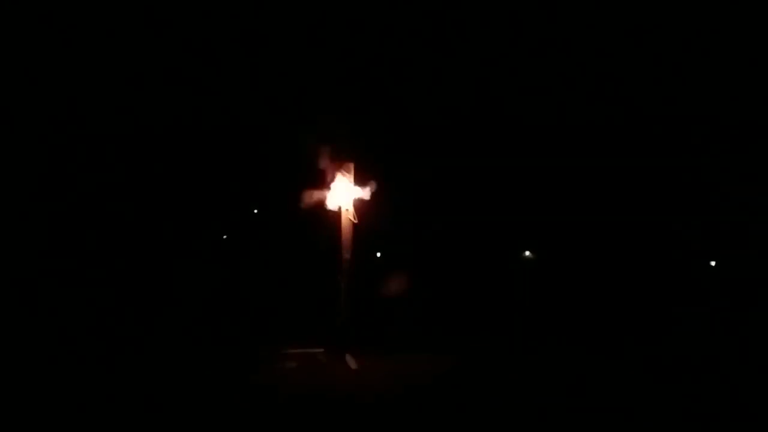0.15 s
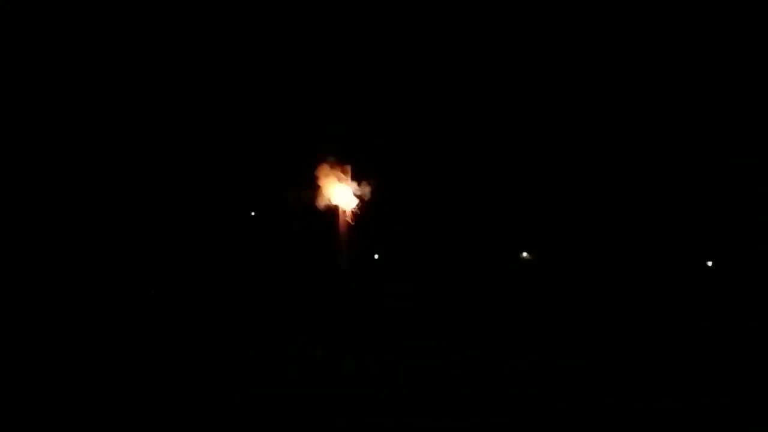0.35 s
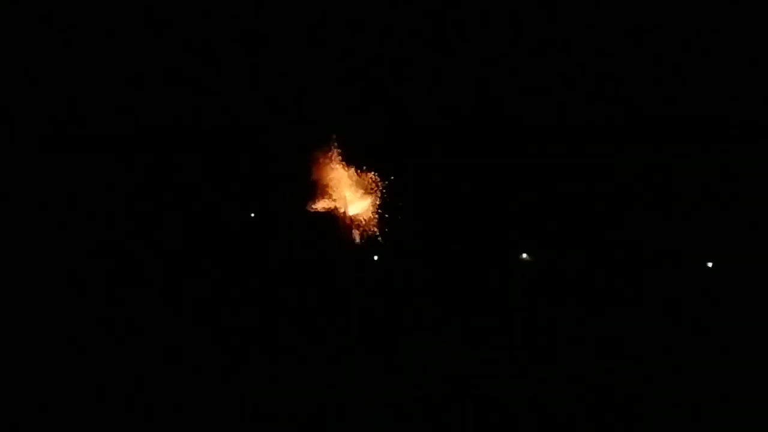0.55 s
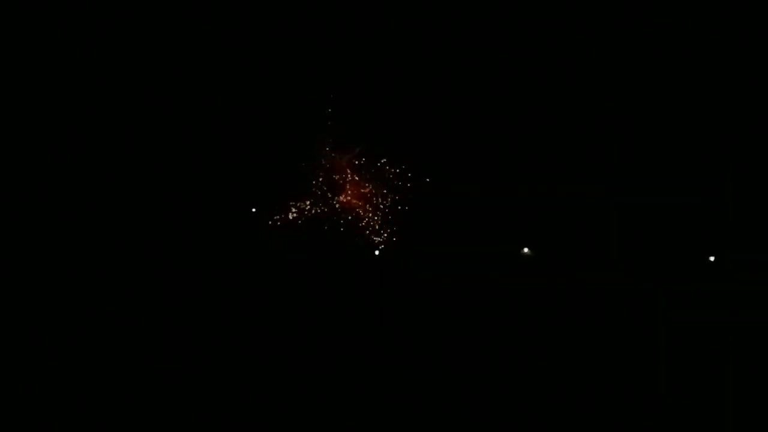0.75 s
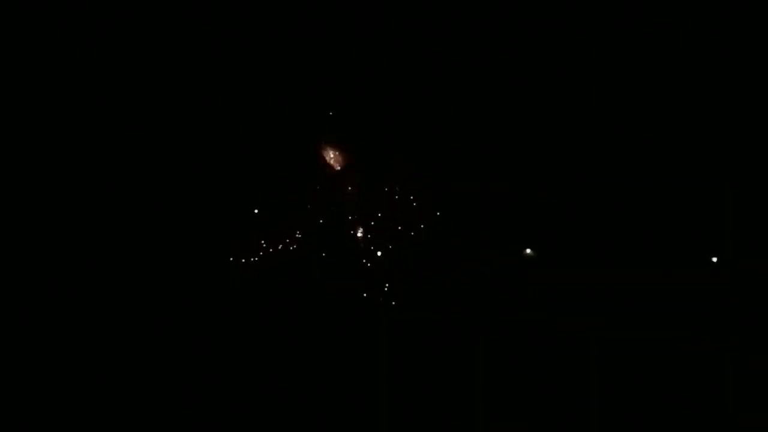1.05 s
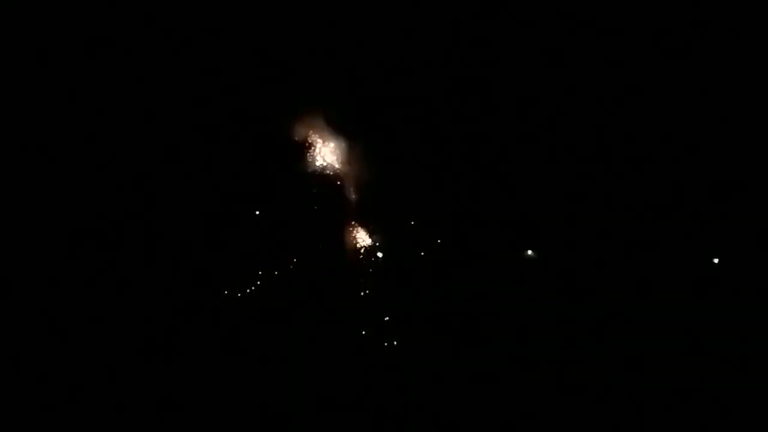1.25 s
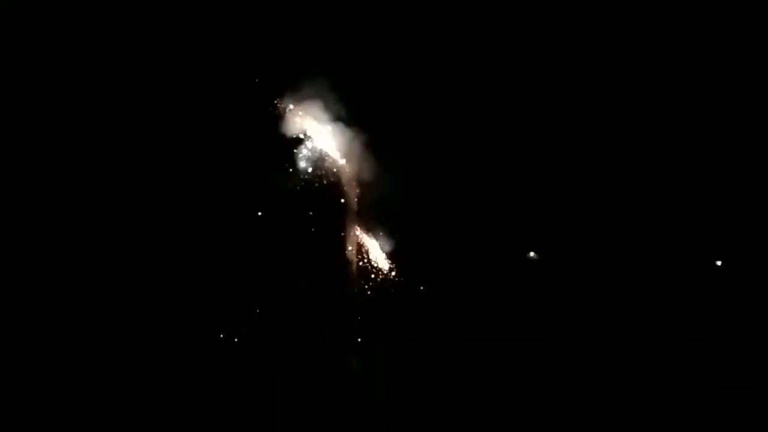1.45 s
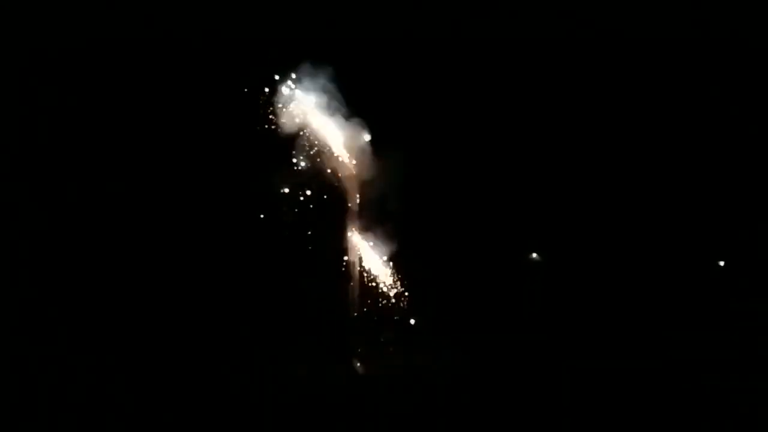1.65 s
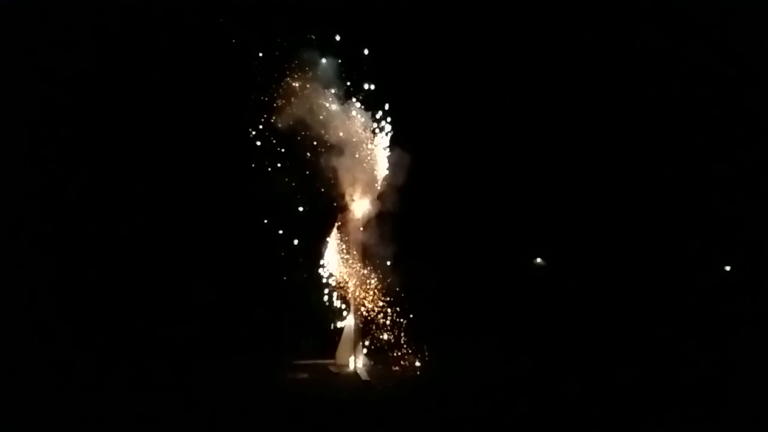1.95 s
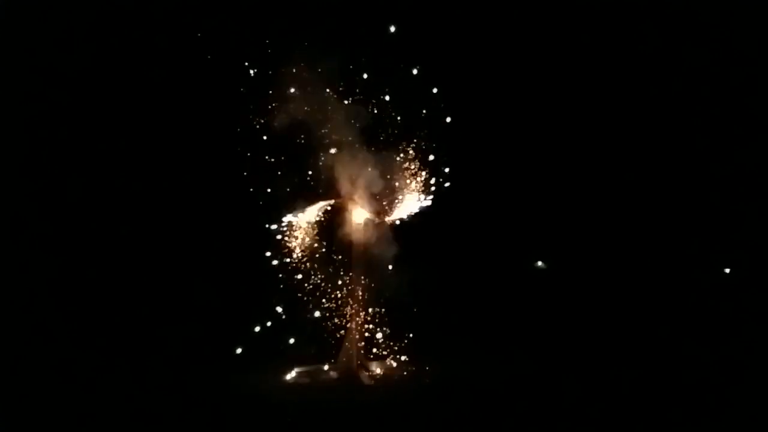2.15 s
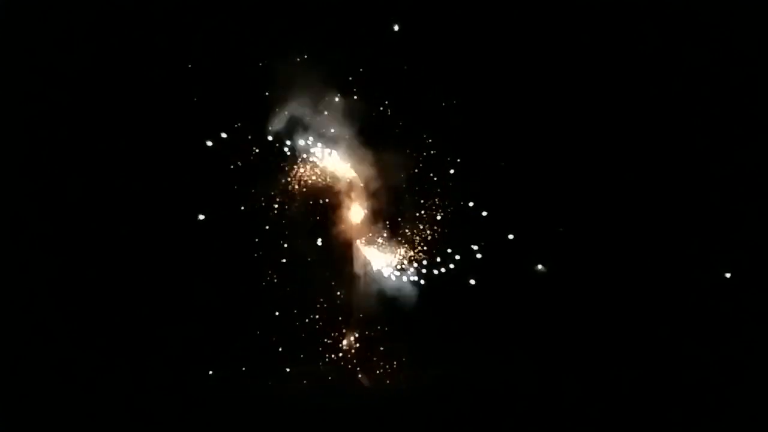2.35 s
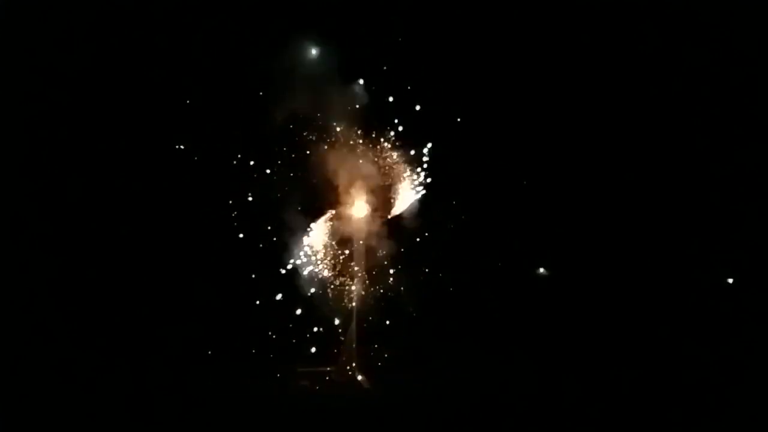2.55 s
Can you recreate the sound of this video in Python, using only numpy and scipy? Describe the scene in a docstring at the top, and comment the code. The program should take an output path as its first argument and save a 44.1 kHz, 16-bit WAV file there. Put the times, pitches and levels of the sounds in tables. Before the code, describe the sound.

A firework wheel sputters, cracks sharply, then hisses and builds to a roar.

```python
"""A firework wheel on a post, outdoors at night, close to a hand-held stereo microphone.
First the fuse sputters; at half a second the priming flares with one sharp crack and dies away.
Around one second, soft bumps reach the microphone over a low rumble, and two opposed rocket drivers
catch. They hiss, start to turn the wheel and build to a roar, their ground echoes sweeping as they
circle. Throughout, a faint tail comes back from farther off, over quiet night air."""
import sys
import numpy as np
from scipy import signal
from scipy.fft import rfft, irfft
from scipy.io import wavfile
from scipy.ndimage import map_coordinates

SR = 44100
rng = np.random.default_rng(int(sys.argv[2]) if len(sys.argv) > 2 else 0)


def to_wav(s):
    """Save 16-bit WAV."""
    ch = np.atleast_2d(s).T  # columns
    pcm = np.round(np.clip(ch, -1, 1) * 32767)  # PCM
    wavfile.write(sys.argv[1], SR, pcm.astype(np.int16))


N = 119070

# burn of the drivers (time [s], hiss [dB], roar [dB], bellow [dB])
DRIVER_BURN = [(.95, -76, -92, -95), (1.1, -54.5, -77, -70), (1.2, -48.5, -57, -72), (1.3, -41.5, -59, -55),
               (1.42, -36.5, -47, -52), (1.53, -33.5, -48, -46.5), (1.64, -26, -44, -42),
               (1.77, -21.5, -36, -34.5), (1.86, -26, -26, -33), (1.97, -26.5, -23.5, -29),
               (2.07, -29.5, -24, -35.5), (2.15, -29, -29, -38.5), (2.33, -33.5, -28, -41.5),
               (2.43, -28.5, -29, -35), (2.55, -35, -27, -40.5), (2.62, -36, -29, -41.5),
               (2.7, -39, -28.5, -40)]
# pressure pulses of the priming (time [s], level [dB], half-width [s])
CRACK_PULSES = [(0.4997, -15.5, 0.00019), (0.5387, -4, 0.00022), (0.5435, -23, 0.00053),
                (.579, -17.5, 0.0004)]
# burn of the fuse (time [s], flame [dB], fizz [dB])
FUSE_BURN = [(0, -36.5, -44), (.009, -35.5, -30.5), (.016, -36, -32), (.045, -35.5, -41),
             (.115, -36.5, -42.5), (.135, -40.5, -40), (.172, -37.5, -43.5), (.187, -38.5, -40),
             (.205, -38.5, -45), (.32, -39.5, -51), (.4, -38, -46), (.425, -37, -38), (.49, -38, -35),
             (.55, -48, -48), (.62, -65, -67)]
# bumps on the microphone (time [s], level [dB], pitch [Hz])
MIC_BUMPS = [(0.849, -40, 90.2), (0.89, -25, 92), (0.931, -36, 87), (1.066, -38, 83), (1.112, -27, 109),
             (1.183, -32.5, 100), (1.22, -26, 96), (1.263, -30, 88)]
# rumble at the microphone (time [s], level [dB])
MIC_RUMBLE = [(0, -62), (.45, -57), (.55, -48), (.7, -63), (.82, -54.5), (.92, -43.5), (1.02, -52.5),
              (1.25, -46), (1.6, -45), (2.25, -41.5), (2.7, -46)]
# spectra of the burning gas as heard, including the microphone's treble colour and a reflection
# off the wheel's frame (frequency [Hz], level [dB])
HISS_SPECTRUM = [(200, -19), (600, -5), (1000, -2), (1250, -8), (1650, -10.5), (2000, -2.5), (2700, 1.5),
                 (3200, 1), (4000, -9), (4700, -1), (5500, -1.5), (6700, -10), (7500, -2.5), (8200, -5),
                 (9000, -8), (10500, -9), (12500, -5), (14000, -2.5), (15000, -6.5)]
ROAR_SPECTRUM = [(100, -21), (180, -7), (280, -5), (420, -8), (590, -0.5), (800, -10), (1100, -3.5),
                 (1350, -1), (1600, -5), (1900, -2), (3300, -2.5), (4400, -5.5), (5500, -8), (6800, -11),
                 (8000, -6.5), (9300, -14), (12000, -6), (14500, -9.5)]
BELLOW_SPECTRUM = [(100, -28), (300, -17.5), (440, -5.5), (590, 2.5), (760, -7), (950, -5.5), (1130, -11.5),
                   (1350, -6.5), (1600, -12.5), (4000, -27)]
FLARE_SPECTRUM = [(100, -32), (200, -34), (330, -2.5), (650, 1), (1000, -5.5), (1400, -4), (2000, 2),
                  (3000, -3.5), (4200, -9.5), (5400, -8), (6600, -13.5), (8000, -8.5), (9500, -15.5),
                  (12000, -12), (13400, -4), (15000, -22)]
FUSE_SPECTRUM = [(100, -22), (220, -4), (330, -3.5), (550, 4.5), (1000, -5.5), (1400, -6), (2000, 0.5),
                 (2400, -5), (3000, -8.5), (3600, -15), (5500, -10.5), (6600, -22), (14000, -11)]
FIZZ_SPECTRUM = [(300, -12), (1500, 1), (3000, 1.5), (4200, -2.5), (5400, -3), (6600, -2), (8000, 4),
                 (9500, -4), (12000, -1), (13500, 7), (15000, -4)]
# spectra of the noises at the microphone (frequency [Hz], level [dB])
RUMBLE_SPECTRUM = [(20, -28), (50, -8.5), (85, 0.5), (125, -0.5), (200, -7.5), (400, -14), (1000, -26.5),
                   (4000, -72)]
KNOCK_SPECTRUM = [(100, -43), (270, 10), (450, -8), (1200, -43)]
NIGHT_SPECTRUM = [(30, -20), (200, -13), (600, -8), (2000, -13), (5000, -20), (15000, -19.5)]
# tone of the ground echo and of the distant tail (frequency [Hz], gain [dB])
GROUND_TONE = [(2500, -1.5), (4500, 2), (14000, -8)]
FAR_TONE = [(100, -7), (600, 0.5), (2000, 1.5), (5000, 1.5), (8000, 4), (14000, -4)]
# scatter from nearby (frequency [Hz], level against the direct sound [dB])
NEAR_SCATTER = [(100, -7.5), (600, -7.5), (1200, -5), (2000, -3), (3300, 1.5), (4200, 8), (5200, 0),
                (7000, 2), (10000, 0), (12000, 0), (14000, 16)]
# balance of the microphone's ports (frequency [Hz], left minus right [dB])
PORT_BALANCE = [(100, -2), (700, .5), (1500, -2), (2000, -1), (2900, -2), (3500, 1.5), (5600, .7),
                (6400, 6.5), (7050, 2.5), (7700, 8.5), (8600, 5), (9300, 5.5), (10500, 5.5), (12000, 4.5),
                (13400, 12), (14600, -3)]

HUB_ECHO_S, SWING_S = .00252, 0.000442  # ground echo delay at the hub, its swing with a driver's height
TURN_START_S, REST_RAD, SPIN_RAD_S2 = 1.3, -.4, 5.5


def drivers():
    """Two opposed jets hiss, roar and bellow; the wheel speeds up and swings their ground echoes."""
    angle = REST_RAD + SPIN_RAD_S2 * np.maximum(clock() - TURN_START_S, 0) ** 2 / 2
    out = 0
    for side, db in ((-0.985, 0.045), (0.898, 2.5)):  # lower, then upper driver at rest
        hiss = gas(HISS_SPECTRUM, flutter_db=1.0, flutter_hz=170, pops_per_s=1500, pop_db=-7, spread_db=4.5)
        roar = gas(ROAR_SPECTRUM, flutter_db=3.4, pops_per_s=500, pop_db=-10.5, spread_db=7)
        jet = hiss * curve(DRIVER_BURN, 1) + roar * curve(DRIVER_BURN, 2)
        jet += noise(BELLOW_SPECTRUM) * curve(DRIVER_BURN, 3)
        echo_s = HUB_ECHO_S + side * SWING_S * np.cos(angle)
        out += undb(db) * with_ground_echo(jet, echo_s, share=0.54)
    return out / np.sqrt(2)


def crack(low_cut_hz=330):
    """Short pressure waves, a push and then a pull, as the priming bursts its wrapping."""
    pulses = 0
    for at, db, width in CRACK_PULSES:
        u = (clock() - at) / width
        pulses -= undb(db) * u * np.exp((1 - u * u) / 2)
    low_cut = signal.butter(2, low_cut_hz, "high", fs=SR, output="sos")
    return with_ground_echo(signal.sosfilt(low_cut, pulses), HUB_ECHO_S, share=0.68)


def flare(on_s=0.511, off_s=0.57, full_db=-21, rise_db_s=370, fall_db_s=240):
    """The priming whooshes up, holds and burns out."""
    t = clock()
    db = full_db - rise_db_s * np.maximum(on_s - t, 0) - fall_db_s * np.maximum(t - off_s, 0)
    flame = gas(FLARE_SPECTRUM, flutter_db=4.2, pops_per_s=1500, pop_db=-2, spread_db=0.5)
    return with_ground_echo(flame * undb(db), HUB_ECHO_S, share=0.12)


def fuse():
    """The fuse sputters and fizzes at the hub."""
    flame = gas(FUSE_SPECTRUM, flutter_db=1.5, pops_per_s=900, pop_db=-11, spread_db=2.5)
    fizz = gas(FIZZ_SPECTRUM, flutter_db=2.8, pops_per_s=1800, pop_db=-16, spread_db=0)
    burn = flame * curve(FUSE_BURN, 1) + fizz * curve(FUSE_BURN, 2)
    return with_ground_echo(burn, HUB_ECHO_S, share=0.53)


def gas(spectrum, flutter_db, pops_per_s, pop_db, spread_db, flutter_hz=120):
    """Burning gas: fluttering turbulence and tiny pops of uneven size."""
    rush = rng.standard_normal(N) * undb(flutter_db * wander(flutter_hz))
    sizes = undb(spread_db * np.minimum(rng.exponential(size=N), 4))
    pops = (rng.random(N) < pops_per_s / SR) * sizes * rng.choice([-1, 1], N)
    return unit(colour(unit(rush) + undb(pop_db) * unit(pops), spectrum))


def mic_bumps(half_width_cycles=0.64, knock_db=-20):
    """Right at the hand-held microphone: soft thumps with a little knock in them, over a low rumble."""
    out = curve(MIC_RUMBLE) * noise(RUMBLE_SPECTRUM)
    knock = undb(knock_db) * noise(KNOCK_SPECTRUM)
    for at, db, hz in MIC_BUMPS:
        cycles = (clock() - at) * hz
        envelope = undb(db) * np.exp(-(cycles / half_width_cycles) ** 2)
        out += envelope * (knock - np.sin(2 * np.pi * cycles))
    return out


def with_ground_echo(x, delay_s, share):
    """The direct sound and its reflection off the ground between post and microphone."""
    echo = map_coordinates(x, [(clock() - delay_s) * SR], order=3)
    return (x + share * colour(echo, GROUND_TONE)) / np.hypot(1, share)


def near_scatter(x, count=16, longest_s=.02, drift_hz=30):
    """Diffuse reflections from close by, their phases drifting at random to blur without ringing."""
    analytic = signal.hilbert(x, 2 * N)[:N]
    out = 0
    for lag in (rng.uniform(.1, 1, count) * longest_s * SR).astype(int):
        delayed = np.pad(analytic, (lag, 0))[:N]
        out += (delayed * np.exp(1j * np.pi * wander(drift_hz))).real
    return out / np.sqrt(count)


def at_ports(x, left_lead_s=.000022):
    """Direct sound reaches the left port first; near scatter blurs the treble between the two."""
    hz = np.fft.rfftfreq(2 * N, 1 / SR)
    direct = rfft(x, 2 * N) * np.exp(2j * np.pi * hz * left_lead_s * np.array([[.5], [-.5]]))
    blur = rfft(np.array([near_scatter(x), near_scatter(x)]), 2 * N)
    share = gains(NEAR_SCATTER)
    return irfft((direct + share * blur) / np.hypot(1, share))[:, :N]


def far_tail(x, t60_s=0.86, gain_db=-16):
    """The distant surroundings return a diffuse decay, different on each side."""
    decay = rng.standard_normal((2, N)) * undb(-60 * clock() / t60_s)
    tail = signal.fftconvolve(x[None], unit(decay) / np.sqrt(N), axes=1)[:, :N]
    return undb(gain_db) * colour(tail, FAR_TONE)


def night_air(level_db=-53):
    """Faint, steady noise all around the microphone."""
    return undb(level_db) * noise(NIGHT_SPECTRUM, (2, N))


def undb(db):
    """Decibels to gain."""
    return 10 ** (np.asarray(db) / 20)


def unit(x):
    """Scale to rms 1."""
    return x / np.sqrt(np.mean(x ** 2))


def clock():
    """Time of every sample."""
    return np.arange(N) / SR


def curve(table, column=1):
    """Gain over time from one dB column of a table."""
    rows = np.array(table)
    return undb(np.interp(clock(), rows[:, 0], rows[:, column]))


def gains(points):
    """Gain of each frequency bin from (frequency [Hz], level [dB]) points."""
    hz, db = np.array(points).T
    bin_hz = np.arange(N + 1) * SR / (2 * N)
    return undb(np.interp(np.log(bin_hz + 1), np.log(hz), db))


def colour(x, points):
    """Filter by a spectrum."""
    return irfft(rfft(x, 2 * N) * gains(points))[..., :N]


def noise(spectrum, shape=N):
    """Coloured noise of rms 1."""
    return unit(colour(rng.standard_normal(shape), spectrum))


def wander(rate_hz):
    """Smooth random drift with spread near 1."""
    return map_coordinates(rng.standard_normal(4096), [clock() * rate_hz], order=2, mode="wrap")


def scene():
    """From where the microphone is held: the wheel, the bumps, the distant tail and the night air."""
    burning = fuse() + flare() + drivers()
    cracks = crack()
    background = far_tail(burning + cracks) + night_air()
    return at_ports(burning + mic_bumps()) + cracks + background


def record(dry, top_hz=14650):
    """Each microphone port colours the sound its own way; the top is cut steeply."""
    tilt = gains(PORT_BALANCE) ** np.array([[.5], [-.5]])
    tilt /= np.sqrt(np.mean(tilt ** 2, axis=0))
    heard = irfft(rfft(dry, 2 * N) * tilt)[:, :N]
    return signal.sosfilt(signal.ellip(12, .2, 80, top_hz, fs=SR, output="sos"), heard)


dry = scene()
out = record(dry)
to_wav(out)
```